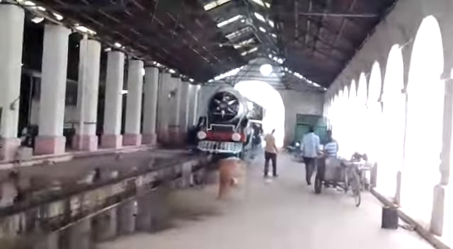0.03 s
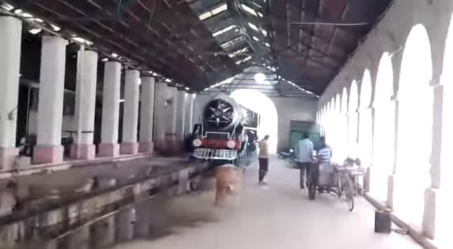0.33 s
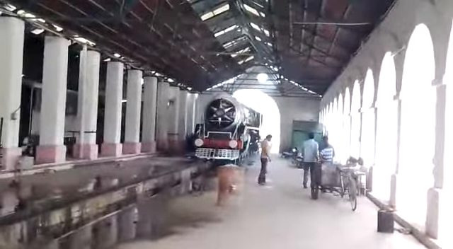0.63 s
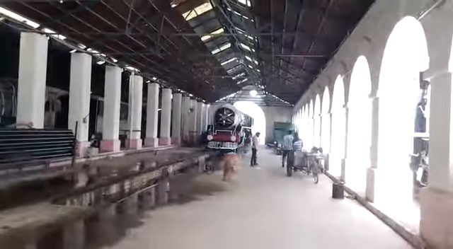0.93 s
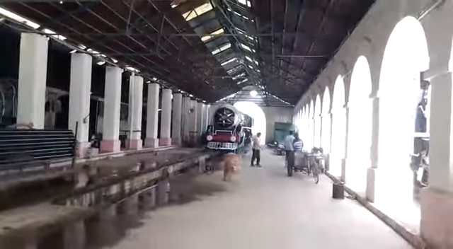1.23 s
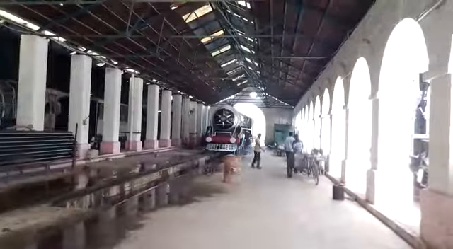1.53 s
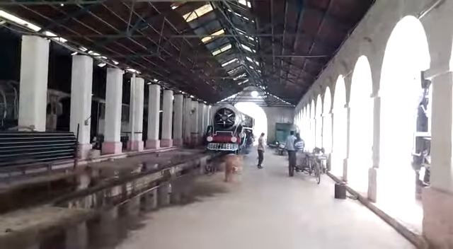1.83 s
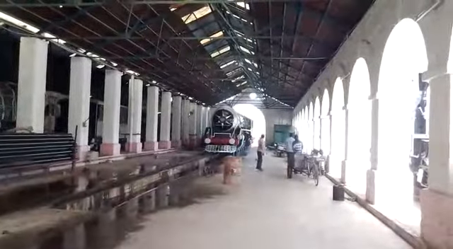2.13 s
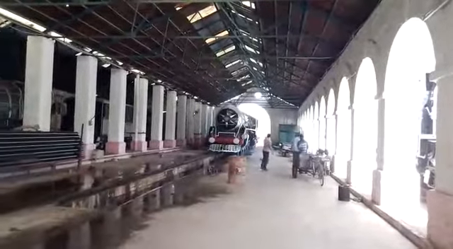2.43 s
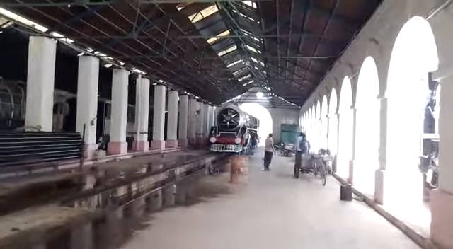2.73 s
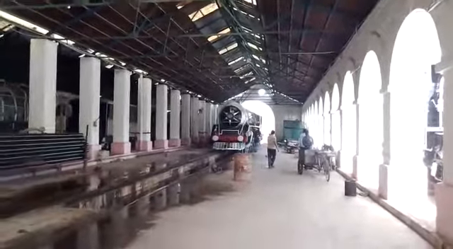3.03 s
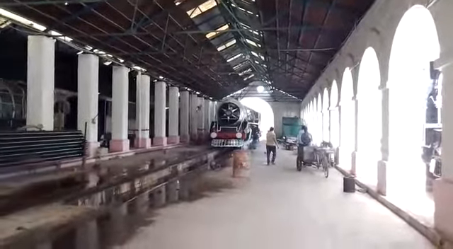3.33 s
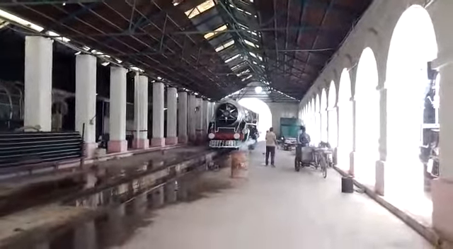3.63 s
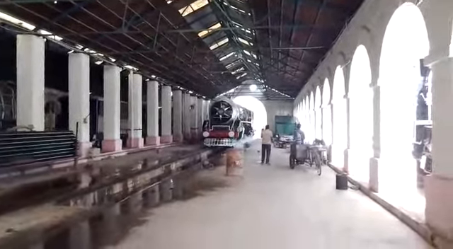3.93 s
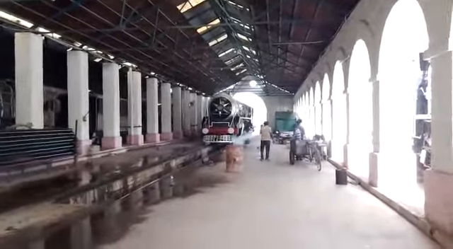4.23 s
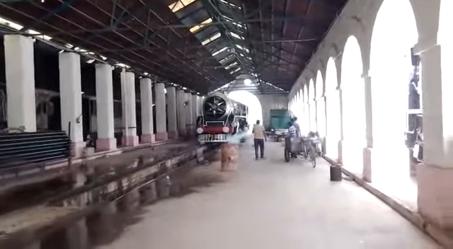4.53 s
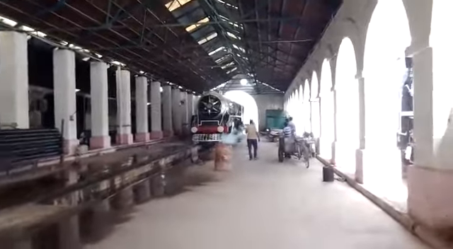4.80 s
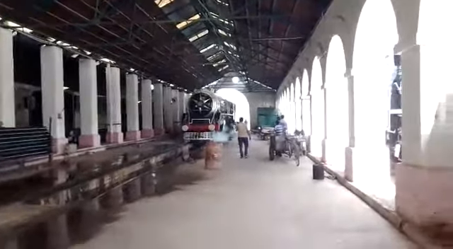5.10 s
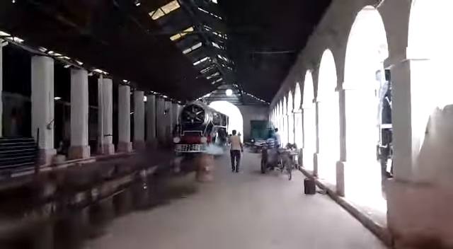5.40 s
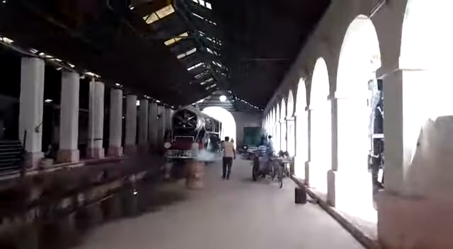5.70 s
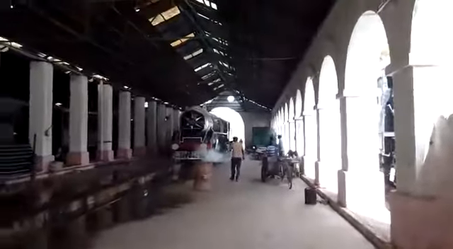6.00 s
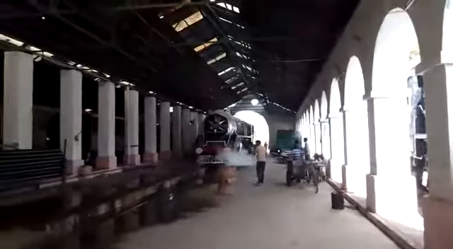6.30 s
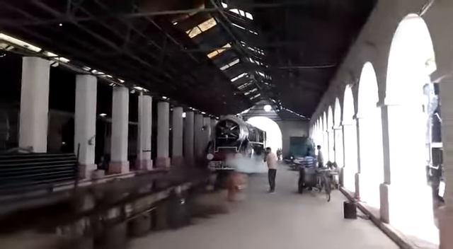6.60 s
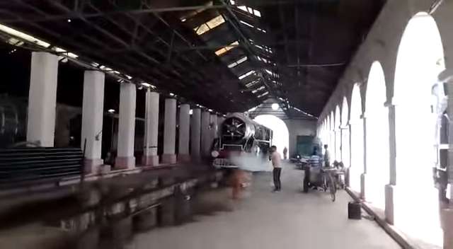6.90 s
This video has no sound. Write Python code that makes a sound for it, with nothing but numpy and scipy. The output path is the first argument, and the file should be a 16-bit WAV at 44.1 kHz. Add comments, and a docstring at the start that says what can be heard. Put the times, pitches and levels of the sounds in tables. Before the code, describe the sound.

A steam locomotive idles far down a large railway shed with a low murmur and a thin hiss. Its whistle gives one short, shrill blast that overloads the microphone with a rough rush and rings on under the roof. Faint moaning tones and a few dull knocks follow. Then steam blows from the engine, starting as a hiss and growing into a steady, deepening roar.

```python
"""In a long railway shed, a steam locomotive idles with a low murmur and hissing leaks.
Steam sets its whistle singing for one shrill blast, which overloads the microphone and rings on
under the roof. After faint moans and dull knocks, steam blows from the cylinder drains:
a hiss at first, then a steady roar that deepens as the cloud grows."""
import sys
import numpy as np
from scipy import signal
from scipy.fft import rfft, irfft
from scipy.io import wavfile
from scipy.ndimage import uniform_filter1d, minimum_filter1d

SR = 44100
rng = np.random.default_rng(int(sys.argv[2]) if len(sys.argv) > 2 else 0)


def wav_record(signal):
    """Record a signal, one row per channel, as 16-bit PCM in the file named by sys.argv[1]."""
    frames = np.transpose(np.atleast_2d(signal))
    bounded = np.clip(frames, -1, 1)
    # unit amplitude maps onto the largest positive 16-bit level
    quanta = np.round(bounded * 32767).astype(np.int16)
    wavfile.write(sys.argv[1], SR, quanta)


N = 315315
T = np.arange(N) / SR
BINS_HZ = np.fft.rfftfreq(1024, 1 / SR)  # noise is shaped on a grid of these pitches
FRAMES_S = np.arange(N // 256 + 5) * 256 / SR  # and these moments


def amp(db):
    """Turns decibels into a number to multiply a sound by."""
    return 10 ** (np.asarray(db) / 20)


def unit(x):
    """Scales a signal to an average power of 1."""
    return x / np.sqrt(np.mean(x ** 2) + 1e-20)


def curve(rows):
    """Joins each column of a table with straight lines through time."""
    times_s, *columns = np.transpose(rows)
    return [np.interp(T, times_s, column) for column in columns]


def colour(points, hz=BINS_HZ):
    """Joins a table's points from low pitch to high, spaced by octaves."""
    pitches_hz, values = np.transpose(points)
    return np.interp(np.log(hz + 1), np.log(pitches_hz), values)


def swell(peak_s, half_s, t=T):
    """A smooth hump of height 1 around a moment."""
    return np.exp(-((t - peak_s) / half_s) ** 2)


def since(start_s):
    """Seconds gone by after a moment, zero before it."""
    return np.maximum(T - start_s, 0)


def wander(rate_hz):
    """A random wobble, up to about the given speed."""
    hz = np.fft.rfftfreq(N, 1 / SR)
    return unit(irfft(rfft(rng.standard_normal(N)) / (1 + (hz / rate_hz) ** 4), N))


def noise(colour_db, patchy_db):
    """Steady rushing noise of a given colour, with drifting louder and softer patches."""
    real, imaginary, patches = rng.standard_normal((3, len(FRAMES_S), len(BINS_HZ)))
    patches = uniform_filter1d(patches, size=14, axis=0)
    patches = unit(uniform_filter1d(patches, size=16, axis=1))
    shape = amp(colour_db) / np.linalg.norm(amp(colour_db), axis=-1, keepdims=True)
    spectrum = (real + 1j * imaginary) * shape * amp(patchy_db * patches)
    return unit(signal.istft(spectrum.T, nperseg=1024, noverlap=768)[1][:N])


def fuzzy_tone(pitch_hz, width_hz):
    """A blurred note: a narrow band of noise around one pitch."""
    angle = 2 * np.pi * pitch_hz * T
    return wander(width_hz) * np.cos(angle) + wander(width_hz) * np.sin(angle)


# How strong each noise is from bass to treble: pitch_hz, level_db
MURMUR_COLOUR = [(20, -4.5), (50, 0), (85, 3), (130, -1), (200, 0.5), (350, -5.5), (560, -4), (800, -7.5),
                 (1500, -4.5), (3000, -9.5), (8000, -36.5), (16000, -57.5)]
LEAK_COLOUR = [(100, -28), (1500, -9), (3000, -3.5), (4200, 2), (5200, -2), (6300, -3.5), (7800, -0.5),
               (9000, -12.5), (10500, -21), (13000, -33.5), (15000, -22.5), (16000, -27)]  # also the short bursts of hiss during the blast
HISS_COLOUR = [(30, -35), (400, -6), (900, -2), (1600, 0), (3600, -0.5), (5000, -6.5), (6400, -11.5),
               (7800, -9), (9000, -18), (10500, -25.5), (13000, -33.5), (15000, -26.5), (16000, -30)]  # also the drains
# How loud the two leaks are: time_s, thin_db, breathy_db
LEAK_LEVELS = [(0, -38.5, -53), (.4, -35.5, -46), (2.0, -34.5, -40.5), (2.25, -41, -35), (3.5, -39.5, -37)]
def idle(murmur_db=-36.5):
    """The waiting engine murmurs while steam escapes from two leaks."""
    thin_db, breathy_db = curve(LEAK_LEVELS)
    murmur = noise(colour(MURMUR_COLOUR), patchy_db=0.03) * amp(murmur_db)
    thin = noise(colour(LEAK_COLOUR), patchy_db=1.3) * amp(thin_db)
    breathy_peak_db = 5 * np.exp(-((BINS_HZ - 2200) / 400) ** 2)
    breathy = noise(colour(HISS_COLOUR) + breathy_peak_db, patchy_db=2.3) * amp(breathy_db)
    return murmur + thin + breathy


def early_echoes(x, echo_gain=0.094, drift_samples=25):
    """Echoes off floor and pillars ripple the noise, drifting as the microphone moves."""
    samples = np.arange(N)
    delays = rng.integers(100, 2200, size=8)
    echoes = sum(np.interp(samples - delay - drift_samples * wander(0.492), samples, x)
                 for delay in delays)
    return (x + echo_gain * echoes) / np.sqrt(1 + len(delays) * echo_gain ** 2)


# Soft swells of the whistle: peak_s, half_length_s, level_db
FAINT_NOTES = [(0.053, 0.024, -39.5), (.3, 0.27, -48)]
def faint_whistle(pitch_hz=1210, width_hz=8):
    """The whistle sings faintly and a little flat before the blast."""
    level = sum(amp(db) * swell(peak_s, half_s) for peak_s, half_s, db in FAINT_NOTES)
    return fuzzy_tone(pitch_hz, width_hz) * level


OPEN_S, SHUT_S = 0.638, 1.223  # the whistle's valve opens, then starts to shut
def blast_level(fade_from_s, fade_db_per_s, attack_s=0.016, start_db=-11.5, fill_s=0.086):
    """The blast starts fast, builds as it fills the shed, holds, then fades evenly."""
    age_s = since(OPEN_S)
    level_db = start_db * np.exp(-age_s / fill_s) - fade_db_per_s * since(fade_from_s)
    return np.minimum(age_s / attack_s, 1) * amp(level_db)


# The note scoops up, then sags as the valve shuts: time_s, pitch_hz
WHISTLE_PITCH = [(.638, 1138), (.652, 1216), (.68, 1234), (.85, 1250), (1.0, 1256), (1.04, 1244),
                 (1.17, 1243), (1.24, 1228), (1.31, 1172)]
# The tones that make up the note: pitch_multiple, blowing_db, ringing_db, echo_db, loss_per_step_db
WHISTLE_TONES = [(1, 0, 1.5, -11, 10), (2, -27, -18, 6, 7.5), (3, -26, -30, -5, 6), (4, -43, -46.5, 0, 11),
                 (5, -51, -55, -1, 10.5)]
# The note drops out briefly while a short burst of hiss comes up and the even tones flare:
# time_s, half_length_s, depth (0-1), hiss_db, flare_db
DROPOUTS = [(0.721, 0.0079, 0.63, -27, 0), (0.835, 0.018, 0.5, -35, 10), (0.864, 0.0083, 0.91, -21, 15),
            (1.001, 0.012, 0.37, -34, 14), (1.241, 0.0079, 0.33, -30, 14), (1.294, 0.0022, 0.5, -26, 3),
            (1.352, 0.01, 0.36, -40, 7.5)]
def whistle(waver=0.00226, rasp=0.0042, flare_s=0.021, blend_s=0.091, note_db=0.5):
    """Steam makes the whistle's bell sing one unsteady note, which throbs against its own echoes."""
    pitch_hz, = curve(WHISTLE_PITCH)
    cycles = np.cumsum(pitch_hz * (1 + waver * wander(25.7) + rasp * wander(250))) / SR
    blowing = blast_level(SHUT_S, fade_db_per_s=290)
    shut = np.clip(0.5 + (T - SHUT_S) / blend_s, 0, 1)
    flare_db = sum(db * swell(time_s, flare_s) for time_s, _, _, _, db in DROPOUTS)
    # more pressure raises the pitch and brings out the odd overtones
    shrill_db = 0.2 * (pitch_hz - 1244) * (1 - shut)
    # the ringing drops in steps as the echoes run out, one after another
    first_step_s, step_gap_s, edge_s = 1.627, 0.442, 0.025
    steps = sum(0.5 + 0.5 * np.tanh((T - first_step_s - k * step_gap_s) / edge_s) for k in range(5))
    note = 0
    for multiple, blowing_db, ringing_db, echo_db, loss_db in WHISTLE_TONES:
        direct = blowing * np.sin(2 * np.pi * multiple * cycles)
        lift_db = flare_db if multiple % 2 == 0 else shrill_db * (multiple > 1)
        level_db = blowing_db + (ringing_db - blowing_db) * shut + lift_db - loss_db * steps
        note += amp(level_db) * steadied(direct + amp(echo_db) * shed_ring(direct))
    for time_s, half_s, depth, _, _ in DROPOUTS:
        note *= 1 - depth * swell(time_s, half_s)
    return note * blast_level(fade_from_s=0.95, fade_db_per_s=11.5) * amp(note_db)


# How long the shed's echoes take to fade by 60 dB: pitch_hz, fade_s
SHED_FADES = [(200, 2.8), (1200, 1.83), (2500, 0.96), (4000, 2.9), (8000, .7)]
def shed_ring(x):
    """Countless echoes off roof and pillars blend together; the highest treble dies first."""
    hz, t, spectrum = signal.stft(rng.standard_normal(2 * SR), SR, nperseg=256)
    fade_db = -60 * t / colour(SHED_FADES, hz)[:, None]
    tail = signal.istft(spectrum * amp(fade_db), SR)[1]
    near_note = abs(rfft(tail, SR))[1100:1400]  # the pitches around the whistle's note, in Hz
    return signal.fftconvolve(x, tail / np.sqrt(np.mean(near_note ** 2)))[:N]


def steadied(x):
    """Evens out slow fading and keeps the fast throbbing."""
    return x / np.sqrt(abs(uniform_filter1d(x ** 2, size=2100)) + 1e-9)


# A rough, wide rush of noise: pitch_hz, level_db
RUSH_COLOUR = [(20, 15.5), (45, 6), (110, 3.5), (400, -0.5), (900, 0), (2000, 1), (3200, -3), (5000, -7.5),
               (7000, -28.5), (10000, -28), (13000, -37.5), (16000, -39)]
def overload_rush(level_db=-16, flutter_db=0.96, lag_s=0.0055):
    """Rough noise during the blast as the microphone overloads, with a short hiss at each dropout."""
    rush = noise(colour(RUSH_COLOUR), patchy_db=0) * blast_level(SHUT_S, fade_db_per_s=60)
    rush *= amp(level_db + flutter_db * wander(25))
    bursts = sum(amp(db) * swell(time_s + lag_s, half_s) for time_s, half_s, _, db, _ in DROPOUTS)
    return rush + bursts * noise(colour(LEAK_COLOUR), patchy_db=1.7)


def late_echo(ringing, time_s=1.72, pitch_hz=1220, level_db=-3.5, dip_depth=0.7):
    """The ringing dips briefly while one late echo comes back clean and strong."""
    echo = amp(level_db) * swell(time_s, half_s=0.01) * np.sin(2 * np.pi * pitch_hz * T)
    return ringing * (1 - dip_depth * swell(time_s, half_s=0.021)) + echo


# Moans of two tones each: peak_s, half_length_s, lower_pitch_hz, lower_db, upper_db
MOANS = [(2.001, 0.32, 580, -44.5, -62), (2.76, 0.22, 672, -45, -39.5), (3.065, 0.085, 620, -33.5, -38),
         (3.33, 0.24, 654, -42, -54)]
def moans(upper_hz=1363):
    """Faint blurred tones swell and fade far down the shed."""
    upper = fuzzy_tone(upper_hz, width_hz=45)
    sound = 0
    for peak_s, half_s, lower_hz, lower_db, upper_db in MOANS:
        lower = fuzzy_tone(lower_hz, width_hz=75)
        sound += swell(peak_s, half_s) * (amp(lower_db) * lower + amp(upper_db) * upper)
    return sound


# Knocks from the engine: start_s, level_db, fade_s (time to fall by 60 dB)
KNOCKS = [(3.03, -22.5, 0.48), (3.105, -29, 0.73), (3.3, -33.5, 2)]
# Their dull tone: pitch_hz, level_db
KNOCK_COLOUR = [(30, -20), (70, -18), (120, 10), (200, -20), (300, -1), (450, -15), (800, -3),
                (1500, -13.5), (3000, -14), (6000, -29), (16000, -52)]
def knocks(rise_s=0.024):
    """The shed blurs distant knocks into short dull booms."""
    level = 0
    for start_s, level_db, fade_s in KNOCKS:
        age_s = since(start_s)
        level += (1 - np.exp(-age_s / rise_s)) * amp(level_db - 60 * age_s / fade_s)
    return level * noise(colour(KNOCK_COLOUR), patchy_db=1.5)


def drains(start_s=3.18, rise_s=0.84, steepness=1.54):
    """The cylinder drains open smoothly and let out a jet of steam."""
    opening = 1 - np.exp(-(since(start_s) / rise_s) ** steepness)
    return opening * (jet_hiss() + jet_roar(deepen_from_s=start_s + rise_s))


def jet_hiss(level_db=-18, surge_s=4.84, surge_half_s=0.91, dry_hz=2050, wet_hz=3000):
    """One slow surge of water passes through the jet, lifting the pitch and level of its hiss."""
    wet = swell(surge_s, surge_half_s, FRAMES_S)[:, None]
    peak_hz = dry_hz + (wet_hz - dry_hz) * wet
    octaves_away = np.log2((BINS_HZ + 1) / peak_hz)
    peak_db = 5 * wet * np.exp(-(octaves_away / 0.53) ** 2)
    dry_fizz_db = 1.3 * (1 - wet) / (1 + (4500 / (BINS_HZ + 1)) ** 4)
    hiss = noise(colour(HISS_COLOUR) + peak_db + dry_fizz_db, patchy_db=0.5)
    return hiss * amp(level_db + 1.5 * swell(surge_s, surge_half_s))


# The deep roar of the jet: pitch_hz, level_db
ROAR_COLOUR = [(20, -9), (45, 0), (75, 1.5), (110, -4), (200, -1), (400, -4.5), (800, -5.5), (1400, -9),
               (2500, -9.5), (6000, -40), (16000, -60)]
def jet_roar(deepen_from_s, deep_s=4.4, full_s=6.28, ease_s=6.81, full_db=-21):
    """The roar builds and deepens as the steam cloud grows, then eases near the end."""
    grow_db_per_s, ease_db_per_s = 4, 13
    thinness_db = np.interp(FRAMES_S, [deepen_from_s, deep_s], [9, 0])[:, None]
    bass_cut_db = thinness_db / (1 + (BINS_HZ / 300) ** 2)
    level_db = full_db - grow_db_per_s * np.maximum(full_s - T, 0) - ease_db_per_s * since(ease_s)
    return noise(colour(ROAR_COLOUR) - bass_cut_db, patchy_db=0.15) * amp(level_db)


def scene():
    """Everything is far down the shed, straight ahead, so both ears hear the same."""
    whistling = faint_whistle() + late_echo(whistle()) + overload_rush()
    mono = whistling + moans() + knocks() + early_echoes(idle() + drains())
    return np.array([mono, mono])


def record(dry, ceiling=1.32, limit_db=-8.0, top_hz=15800):
    """The microphone overloads, a limiter turns loud moments down, and the very top treble is cut."""
    overloaded = ceiling * np.tanh(dry / ceiling)
    power = uniform_filter1d((overloaded ** 2).mean(0), size=180)
    power_db = 10 * np.log10(abs(power) + 1e-12)
    turn_down_db = minimum_filter1d(np.minimum(limit_db - power_db, 0), size=1700)
    limited = overloaded * amp(uniform_filter1d(turn_down_db, size=300))
    treble_cut = signal.firwin(511, top_hz, window=("kaiser", 9), fs=SR)
    return signal.oaconvolve(limited, treble_cut[None], "same")


dry = scene()
out = record(dry)
wav_record(out)
```